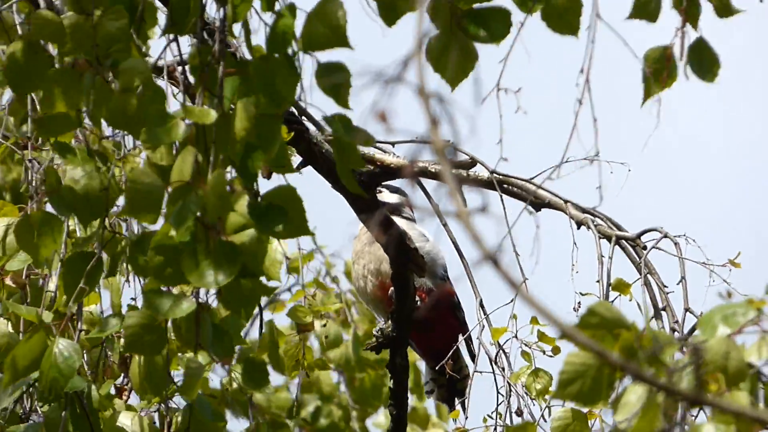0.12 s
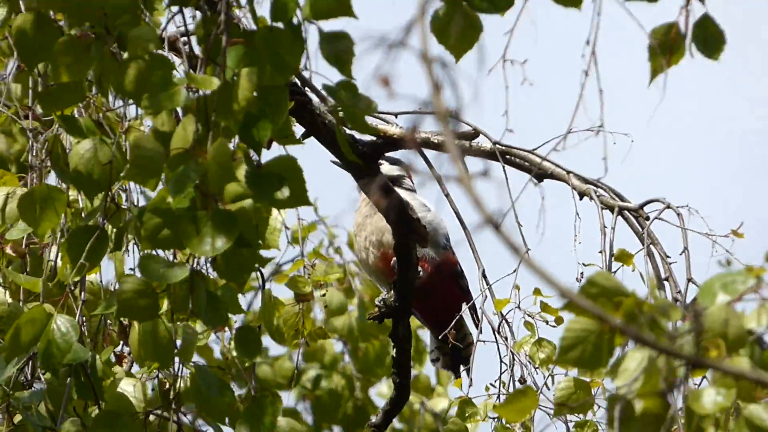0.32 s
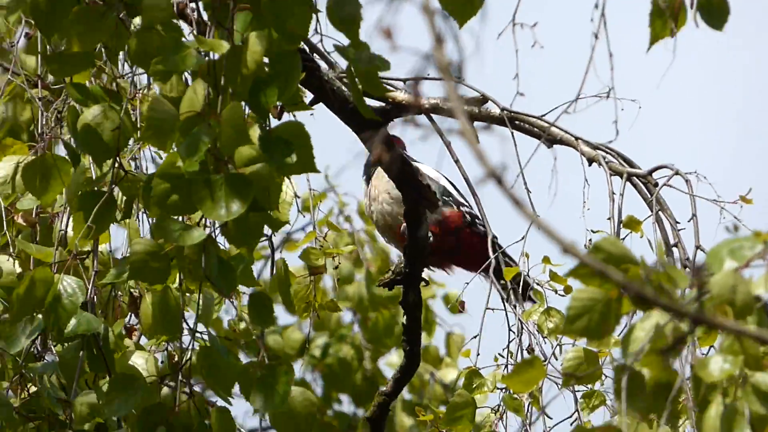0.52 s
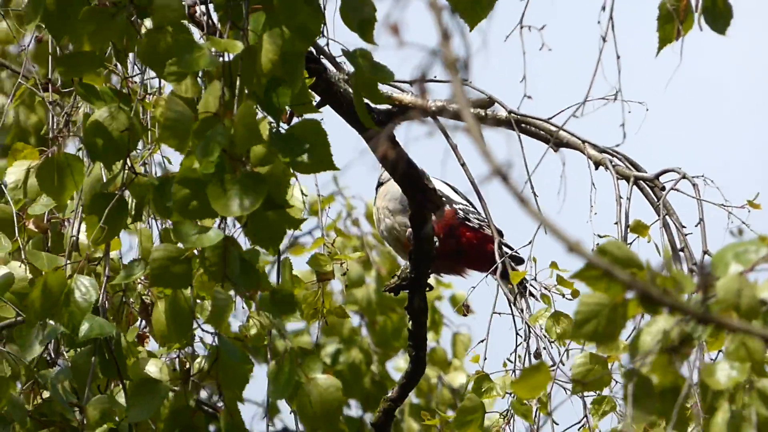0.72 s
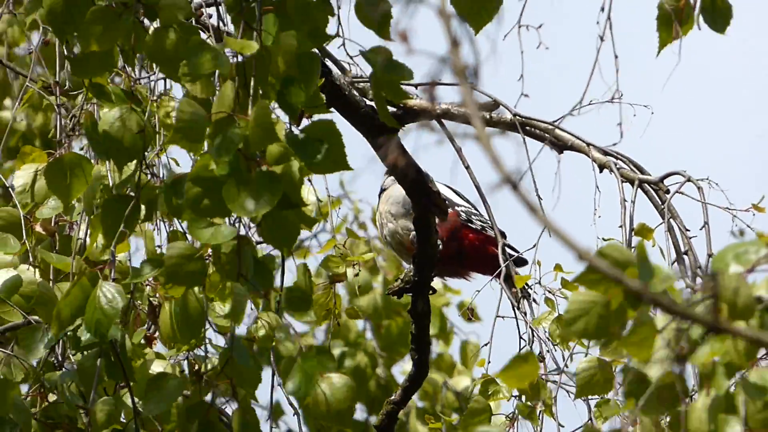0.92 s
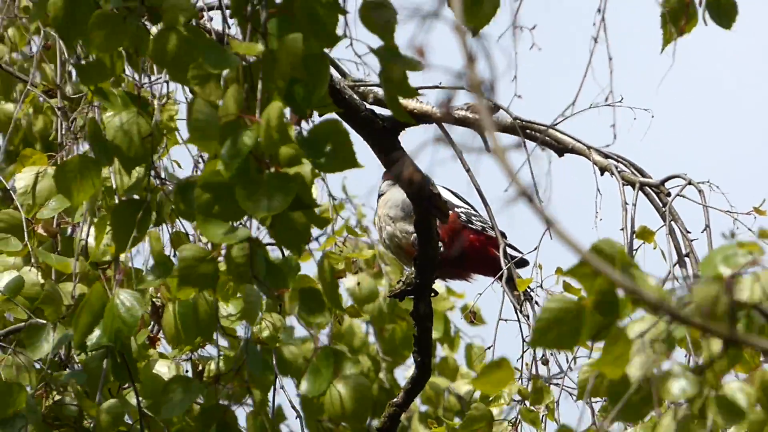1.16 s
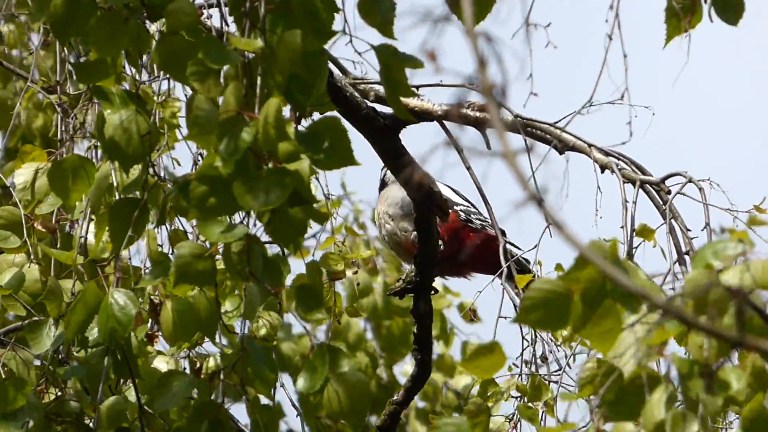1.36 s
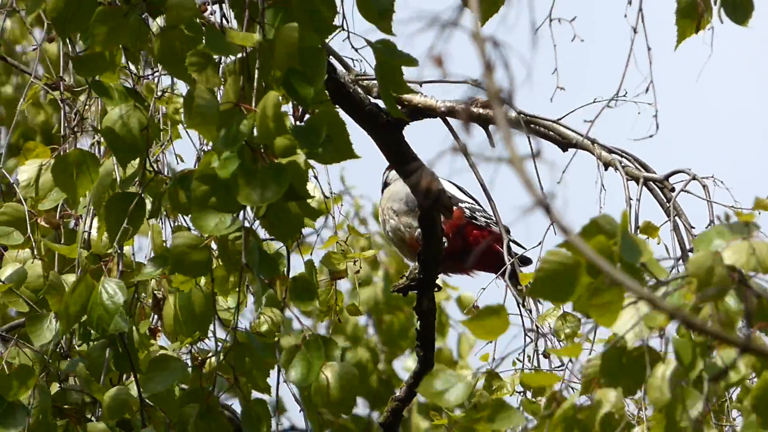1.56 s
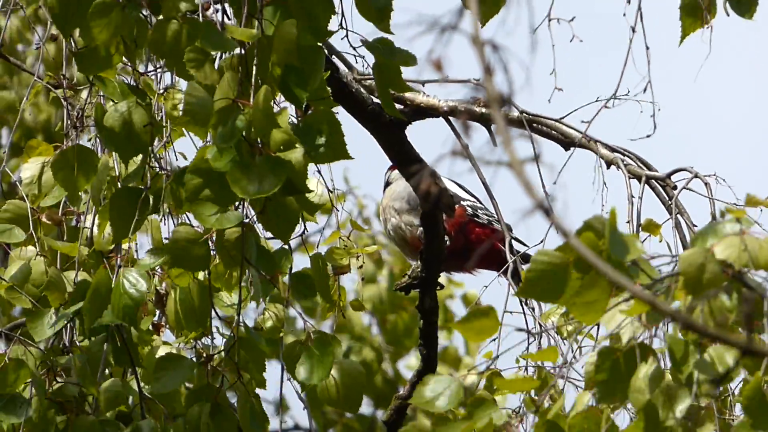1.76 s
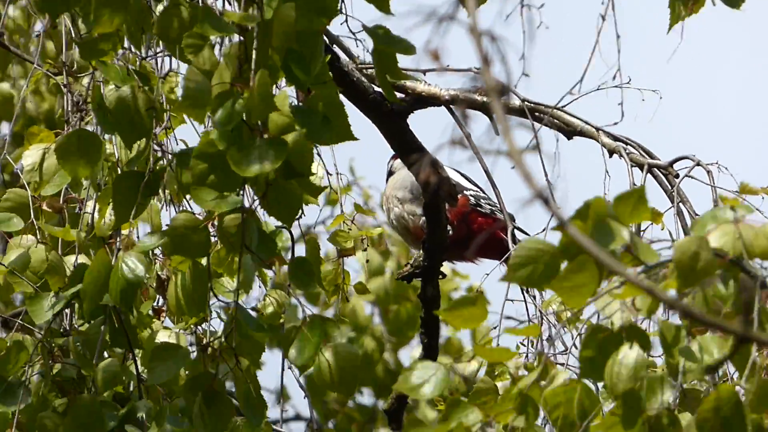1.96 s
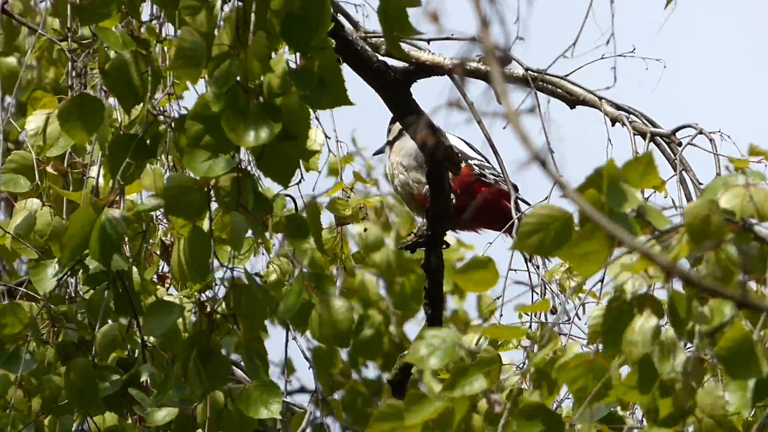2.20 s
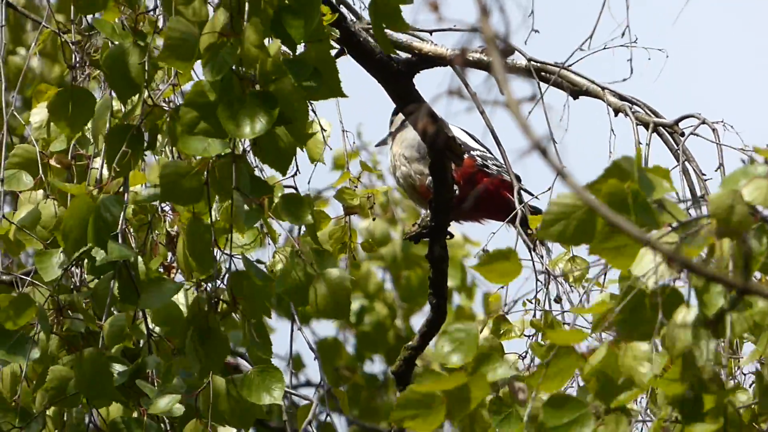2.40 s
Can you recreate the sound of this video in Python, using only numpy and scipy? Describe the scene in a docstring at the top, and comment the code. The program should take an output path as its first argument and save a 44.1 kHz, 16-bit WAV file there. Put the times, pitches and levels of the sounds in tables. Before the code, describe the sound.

Woodpecker calls: single, very short, sharp, slightly raspy kicks at about 0.6, 1.4 and 2.15 seconds, near centre, echoing in the trees; the tail of an earlier call fades at the start. Tiny far chirps at 0.2-0.5. To the right, a thrush-like bird sings fluty, sliding, warbling whistles from 0.2 to 1.5, then thin high squeaks until 1.95. Steady soft traffic hum, air hiss and faint leaf rustle throughout.

```python
"""Distant traffic hum, air hiss and leaf rustle, with the echo of a woodpecker call that has just ended.
A small far bird chirps and a thrush-like bird to the right sings a phrase, while three more sharp calls
sound, two amid the song and one after it. Hum and rustle are coloured noise; far chirps are gliding sines.
Calls are pitch arches with overtones and rasp; the song is sines on drawn pitch lines.
Trunks and leaves scatter all three birds into noise tails."""
import sys
import numpy as np
from scipy import signal
from scipy.fft import rfft, irfft, next_fast_len
from scipy.io import wavfile
from scipy.ndimage import uniform_filter1d

SR = 44100
rng = np.random.default_rng(int(sys.argv[2]) if len(sys.argv) > 2 else 0)


def generate_wav(signal):
    """Clip the signal to [-1, 1] and save it as 16-bit WAV at the path in sys.argv[1]."""
    frames = np.transpose(np.atleast_2d(signal))
    scaled = np.clip(frames, -1, 1) * 32767
    pcm = np.round(scaled).astype(np.int16)
    wavfile.write(sys.argv[1], SR, pcm)


def makeup_ratio(level_db):
    """Linear amplitude ratio for a level in decibels (20 dB per factor of ten)."""
    decades = np.asarray(level_db, float) / 20
    return 10 ** decades


N = 110250
LEAD_SAMPLES = 11025  # birds start this early, so that echoes already ring at time 0

# Hum spectrum. Each row: frequency in Hz, relative density in dB per Hz.
HUM_COLOUR = [(20, -21), (40, -22.5), (65, -5), (110, -3.5), (180, -7), (300, -4.5), (500, -5.5), (850, -6),
              (1300, -13.5), (2000, -19.5), (3200, -22), (5000, -31), (8000, -32.5), (12000, -36),
              (15500, -56)]
# Hum width. Each row: frequency in Hz, side over mid in dB.
HUM_SIDE = [(60, -28.5), (110, -18.5), (200, -15.5), (380, -10), (700, -8), (1290, -3), (2380, -7.5),
            (4400, -1.5), (8120, -2.5), (15000, 5.5)]
# Hum balance. Each row: frequency in Hz, left over right in dB.
HUM_PAN = [(60, 6), (110, -2), (200, 0.5), (380, -3), (700, -3), (1290, 0), (2380, -1.5), (4400, 0),
           (8120, 1), (15000, 0.5)]
# Rustle strength. Each row: time in seconds, level in dB before RUSTLE_LIFT_DB.
RUSTLE_LEVEL = [(0.0, -60), (0.58, -63), (0.72, -68.5), (1.06, -70), (1.3, -67.5), (1.45, -55.5),
                (1.68, -100), (1.93, -65), (2.08, -65), (2.21, -65), (2.36, -64.5), (2.5, -88)]
# Rustle spectrum. Each row: frequency in Hz, relative density in dB per Hz.
RUSTLE_COLOUR = [(1500, -5), (3000, 4), (4500, 4.5), (8000, -1), (11000, -9), (15500, -23)]
# Woodpecker calls. Each row: start in seconds, top pitch in Hz, level in dB before throat and shade.
CALLS = [(-.17, 2626, -24.5), (.594, 2605, -35), (1.406, 2625, -35.5), (2.157, 2660, -35)]
# Faint rising tone added just ahead of each call. One row: length in seconds, from Hz, to Hz,
# level re the call in dB.
LEAD_TONE = (0.02, 2194, 3098, -10.5)
# Woodpecker throat resonance. Each row: frequency in Hz, gain in dB.
CALL_THROAT = [(900, -4), (2000, -3), (2700, -0.5), (3500, -3.5), (4500, -3), (5250, 2), (6200, -16),
               (8000, -11.5), (10500, -14), (13000, -16), (16000, -38)]
# Leaves and the turned head shade the direct call. Each row: frequency in Hz, gain in dB.
CALL_SHADE = [(2500, 2), (5200, -2.5), (7500, 0), (15000, -15)]
# Echoes of calls and far chirps. One row: level in dB before colour, fade-in in seconds, early t60 in
# seconds, late t60 in seconds, late start in dB, side over mid in dB, colour (rows: Hz, dB).
CALL_TREES = (-1.06, 0.0046, 0.098, 0.55, -12, -6.5, [(1000, 5), (2000, -4), (2650, -1.5), (3300, 1.5),
              (4200, 4), (5200, 1.5), (7000, 2.5), (10000, 0), (15000, -3.5)])
# Far bird. Each row: start in seconds, length in seconds, from Hz, to Hz, level in dB.
FAR_CHIRPS = [(0.182, .035, 4400, 4720, -60.5), (.23, 0.043, 4300, 4510, -67),
              (.305, 0.026, 3740, 4080, -57.5), (0.378, 0.034, 4000, 3640, -65),
              (.45, 0.0256, 3910, 4360, -56), (0.479, 0.037, 4200, 3890, -63)]
# Song, one list a voice line; the sixth and seventh overlap as a rich start and purer continuation of
# one note. Each row: time in seconds, pitch in Hz, fundamental in dB before shade and pan.
SONG_LINES = [
    [(.21, 2340, -65), (.224, 2081, -48), (.236, 2062, -38.5), (.268, 2015, -38.5), (.278, 1854, -37),
     (.288, 1900, -43), (.292, 1840, -67)],
    [(.296, 1520, -76), (.304, 1692, -46), (.31, 1770, -74), (.314, 1560, -53), (.322, 1860, -42.5),
     (.328, 1900, -70)],
    [(.329, 1590, -60), (.335, 2010, -44), (.34, 2748, -44.5), (.35, 2580, -40), (.386, 2140, -38.5),
     (.422, 2118, -43), (.43, 2068, -33), (.44, 1860, -49), (.444, 1870, -70)],
    [(.545, 2060, -75), (.556, 2006, -46.5), (.58, 2173, -42), (.625, 2040, -32.5), (.66, 2002, -32),
     (.72, 1798, -35), (.772, 1768, -44.5), (.78, 1560, -75.5)],
    [(.83, 2154, -52.5), (.846, 2154, -33), (.894, 2712, -41), (.96, 2783, -40), (1.0, 2664, -37.5),
     (1.06, 2411, -36), (1.126, 2132, -37), (1.136, 1820, -43.5), (1.14, 1700, -74)],
    [(1.222, 1423, -86), (1.23, 1484, -53.5), (1.26, 1533, -59), (1.285, 1560, -53), (1.3, 1674, -59),
     (1.318, 1770, -62)],
    [(1.255, 1534, -62), (1.275, 1584, -48), (1.298, 1770, -37.5), (1.32, 2022, -32), (1.344, 2150, -44),
     (1.368, 1757, -34), (1.394, 1571, -52.5), (1.43, 1483, -45), (1.458, 1725, -37.5),
     (1.468, 1820, -36.5), (1.476, 1610, -57)],
    [(1.612, 6000, -85), (1.62, 6197, -59), (1.63, 6500, -52.5), (1.641, 7870, -48.5), (1.654, 7540, -44),
     (1.664, 6950, -46), (1.68, 7010, -39), (1.746, 6855, -58), (1.756, 6900, -70)],
    [(1.742, 5630, -62), (1.75, 6100, -43), (1.76, 6980, -52), (1.776, 7360, -44), (1.786, 6520, -41),
     (1.806, 6688, -45), (1.84, 6650, -65), (1.87, 6560, -89)],
    [(1.865, 3410, -85), (1.876, 3728, -55), (1.9, 4083, -43.5), (1.91, 4545, -40.5), (1.92, 4960, -33.5),
     (1.932, 5320, -57), (1.94, 5320, -70)],
]
# Voice of each line. Each row: octave re fundamental in dB, each of overtones 3-6 re fundamental in dB,
# warble rate in Hz, warble depth in Hz, warble start in seconds, throb depth (0-1), pitch jitter (share).
# At rate 0 the depths are steady shifts of pitch and level.
SONG_VOICE = [(-32, -51, 0, 4, 0, 0.09, 0.0033), (-18, -27, -2, 0, 0, 0, 0.008),
              (-30, -36, -3, 0, 1, 0, 0.0012), (-31, -44.5, 81.5, 78, .497, 0.24, 0.0046),
              (-29, -32.5, 37, 130, 0.91, 0.09, 0.0043), (3.5, -7.5, 0, 1, 0, 0, 0.0081),
              (-28, -32, 0, 0, 0, 0.26, 0.0034), (-14.5, -40, -4, 0, 0.36, 0, 0.0034),
              (-12.5, -44, -2, 0, 0.37, 0, .006), (-10, -33, 0, 0, 0, 0, 0.016)]
# Leaves and the turned head shade the direct song. Each row: frequency in Hz, gain in dB.
SONG_SHADE = [(2500, 0.5), (4500, -5), (7000, -1), (10000, -11), (13500, -10), (15000, -14)]
# Echoes of the song. One row, columns as CALL_TREES.
SONG_TREES = (0.5, 0.0035, 0.17, 0.65, -1, -9.5, [(1500, -13.5), (1950, -6), (2700, -4), (3200, 8),
              (5000, -3), (7000, 1), (10000, -3), (13500, 2.5), (15000, -17)])
# Singer's place. Each row: frequency in Hz, left over right in dB.
SONG_PAN = [(1500, -7.5), (2100, -4), (2700, -2), (5000, -4), (8000, -1.5), (14000, -5)]
# Microphone's upper limit. Each row: frequency in Hz, gain in dB.
MIC_TOP = [(13500, 0), (15000, 1), (15700, -16)]

HUM_DB = -51  # rms of the mid before panning
RUSTLE_LIFT_DB, RUSTLE_FLICKER_DB, RUSTLE_FLICKER_HZ = 5, 1.5, 37
CALL_S, CALL_ATTACK_S, CALL_RELEASE_S = .033, .009, .004
CALL_START_HZ, CALL_END_HZ = 1004, 1095
CALL_PEAK_SHARE, CALL_ARCH_POWER = .47, 2.7  # share of the call to its top; higher power, squarer arch
CALL_ROUGH_SHARE, CALL_JITTER_SHARE = .12, .007
CALL_RASP_DB, CALL_PAN_DB = -15, 1  # pan: left over right
WARBLE_RISE_S = 0.069
ECHO_CLUMP_DB, ECHO_CLUMP_HZ = 0.5, 195
RESTING_OFFSET = -.0032  # the recorder's


def curve(table, hz):
    """dB of a (Hz, dB) table on a log-frequency axis."""
    f, db = np.array(table, float).T
    return np.interp(np.log(np.maximum(hz, 1)), np.log(f), db)


def colour(x, gain):
    """Filter by a gain that is a function of frequency."""
    size = next_fast_len(x.shape[-1])
    spectrum = rfft(x, size) * gain(np.fft.rfftfreq(size, 1 / SR))
    return irfft(spectrum, size)[..., :x.shape[-1]]


def wobble(hz, size):
    """Smooth chance of spread 1: noise averaged twice over 1/hz seconds."""
    k = max(int(SR / hz), 1)
    w = uniform_filter1d(uniform_filter1d(rng.standard_normal(size), k), k)
    return w / w.std()


def hum():
    """Far traffic and air: steady coloured noise, the bass alike left and right."""
    mid, side = colour(rng.standard_normal((2, N)), lambda f: makeup_ratio(curve(HUM_COLOUR, f)))
    side = colour(side, lambda f: makeup_ratio(curve(HUM_SIDE, f)))
    out = np.array([colour(mid + sign * side, lambda f: makeup_ratio(sign * curve(HUM_PAN, f) / 2))
                    for sign in (1, -1)])
    return out * makeup_ratio(HUM_DB) / mid.std()


def rustle():
    """Leaves stir in the breeze: a flickering hiss, partly alike left and right."""
    mid, side = colour(rng.standard_normal((2, N)), lambda f: makeup_ratio(curve(RUSTLE_COLOUR, f)))
    level_db = np.interp(np.arange(N) / SR, *np.array(RUSTLE_LEVEL).T) + RUSTLE_LIFT_DB
    level_db = level_db + RUSTLE_FLICKER_DB * wobble(RUSTLE_FLICKER_HZ, N)
    return makeup_ratio(level_db) * (mid + 0.6 * side * np.array([[1], [-1]])) / mid.std()


def trees(x, db, fade_in_s, early_s, late_s, late_db, side_db, tint):
    """Clumpy scattered echoes: convolution with fading noise, mostly alike left and right."""
    t = np.arange(SR) / SR
    fade = makeup_ratio(-60 * t / early_s) + makeup_ratio(late_db - 60 * t / late_s)
    fade = fade * np.clip(t / fade_in_s, 0, 1) ** 2
    fade = fade * makeup_ratio(ECHO_CLUMP_DB * wobble(ECHO_CLUMP_HZ, len(t)))
    tails = colour(rng.standard_normal((2, len(t))) * fade, lambda f: makeup_ratio(curve(tint, f)))
    mid, side = tails / np.sqrt(np.sum(fade ** 2))
    side = side * makeup_ratio(side_db)
    return makeup_ratio(db) * np.array([signal.fftconvolve(x, mid + sign * side)[:len(x)] for sign in (1, -1)])


def chirps(t, rows):
    """Short gliding sines with jittered pitch and rounded ends."""
    out, jitter = np.zeros(len(t)), wobble(300, len(t))
    for start_s, length_s, from_hz, to_hz, db in rows:
        on = (t > start_s) & (t < start_s + length_s)
        u = (t[on] - start_s) / length_s
        hz = (from_hz + (to_hz - from_hz) * u) * (1 + 0.019 * jitter[on])
        phase = 2 * np.pi * np.cumsum(hz) / SR
        out[on] += np.sqrt(2) * makeup_ratio(db) * np.sin(np.pi * u) * np.sin(phase)
    return out


def woodpecker(t):
    """Each call: a faint added tone, then a quick pitch arch with overtones and rasp, through the throat."""
    out = np.zeros(len(t))
    rough, jitter = wobble(1350, len(t)), wobble(1500, len(t))
    first_top_hz = CALLS[0][1]  # rasp lies above the first call's top pitch
    rasp = colour(rng.standard_normal(len(t)), lambda f: makeup_ratio(curve(CALL_THROAT, f)) * (f > first_top_hz))
    rasp = makeup_ratio(CALL_RASP_DB) * rasp / rasp.std()
    for start_s, top_hz, db in CALLS:
        on = (t > start_s) & (t < start_s + CALL_S)
        u = (t[on] - start_s) / CALL_S
        rising = u < CALL_PEAK_SHARE
        from_top = np.where(rising, 1 - u / CALL_PEAK_SHARE, (u - CALL_PEAK_SHARE) / (1 - CALL_PEAK_SHARE))
        end_hz = np.where(rising, CALL_START_HZ, CALL_END_HZ)
        hz = top_hz - (top_hz - end_hz) * from_top ** CALL_ARCH_POWER
        phase = 2 * np.pi * np.cumsum(hz * (1 + CALL_JITTER_SHARE * jitter[on])) / SR
        attack = np.clip(u * CALL_S / CALL_ATTACK_S, 0, 1) ** 2
        release = np.clip((1 - u) * CALL_S / CALL_RELEASE_S, 0, 1)
        envelope = attack * release * (1 + CALL_ROUGH_SHARE * rough[on])
        harmonics = sum(makeup_ratio(curve(CALL_THROAT, k * hz)) * np.sin(k * phase)
                        for k in range(1, 9) if k * top_hz < SR / 2)
        out[on] += np.sqrt(2) * makeup_ratio(db) * envelope * (harmonics + rasp[on])
    tone_s, from_hz, to_hz, tone_db = LEAD_TONE
    lead_tones = [(start_s - tone_s / 1.7, tone_s, from_hz, to_hz, db + tone_db) for start_s, _, db in CALLS]
    out = out + chirps(t, lead_tones)
    direct = colour(out, lambda f: makeup_ratio(curve(CALL_SHADE, f)))
    return direct * makeup_ratio(CALL_PAN_DB / 2 * np.array([[1], [-1]])) + trees(out, *CALL_TREES)


def far_bird(t):
    """Distant chirps, half lost in echoes."""
    x = chirps(t, FAR_CHIRPS)
    return x + trees(x, *CALL_TREES)


def songbird(t):
    """Whistled voice lines: sines on drawn pitch lines with overtones; some warble and throb."""
    out, jitter = np.zeros(len(t)), wobble(133, len(t))
    for line, voice in zip(SONG_LINES, SONG_VOICE):
        octave_db, upper_db, rate_hz, depth_hz, from_s, throb, jitter_share = voice
        s, hz, db = np.array(line).T
        on = (t > s[0]) & (t < s[-1])
        u = t[on]
        swing = np.clip((u - from_s) / WARBLE_RISE_S, 0, 1) * np.cos(2 * np.pi * rate_hz * (u - from_s))
        pitch_hz = uniform_filter1d(np.interp(u, s, hz), size=130)  # rounds the corners
        pitch_hz = pitch_hz * (1 + jitter_share * jitter[on]) + depth_hz * swing
        phase = 2 * np.pi * np.cumsum(pitch_hz) / SR
        upper = sum(np.sin(k * phase) * (k * pitch_hz < .4 * SR) for k in (3, 4, 5, 6))
        tone = np.sin(phase) + makeup_ratio(octave_db) * np.sin(2 * phase) + makeup_ratio(upper_db) * upper
        out[on] += np.sqrt(2) * makeup_ratio(np.interp(u, s, db)) * (1 - throb * swing) * tone
    direct = colour(out, lambda f: makeup_ratio(curve(SONG_SHADE, f)))
    both = direct + trees(out, *SONG_TREES)
    return np.array([colour(channel, lambda f: makeup_ratio(sign * curve(SONG_PAN, f) / 2))
                     for channel, sign in zip(both, (1, -1))])


def scene():
    """Sum of hum, rustle and the three birds, the birds' lead-in cut off."""
    t = np.arange(-LEAD_SAMPLES, N) / SR
    birds = woodpecker(t) + far_bird(t) + songbird(t)
    return birds[:, LEAD_SAMPLES:] + hum() + rustle()


def low_pass(x):
    """Removes everything above the highest recorded frequency."""
    return signal.sosfilt(signal.butter(12, 15640, fs=SR, output="sos"), x)


def record(dry):
    """The microphone loses the very top; a small constant offset is added."""
    mix = colour(dry, lambda f: makeup_ratio(curve(MIC_TOP, f))) + RESTING_OFFSET
    return low_pass(mix)


dry = scene()
out = record(dry)
generate_wav(out)
```